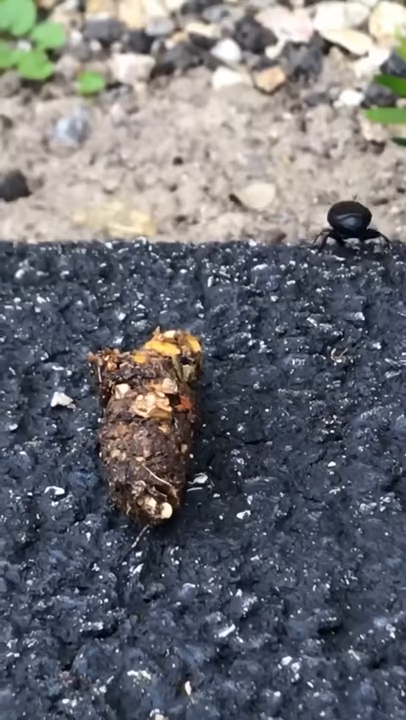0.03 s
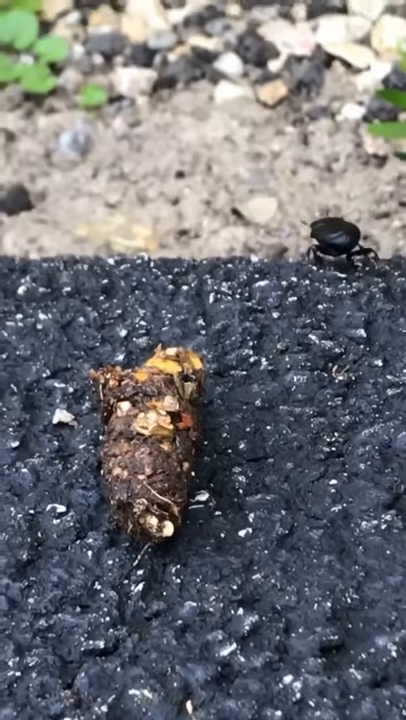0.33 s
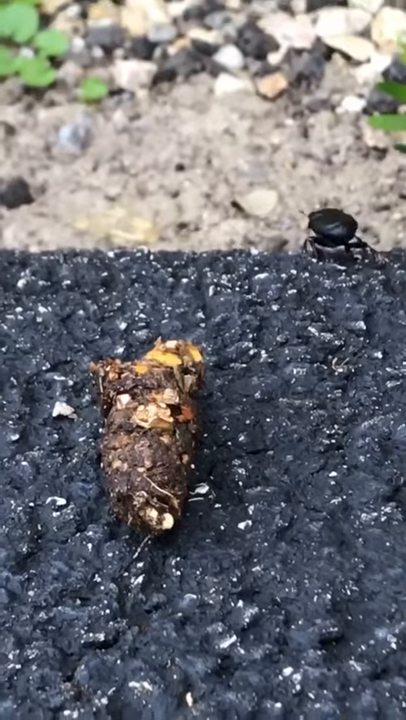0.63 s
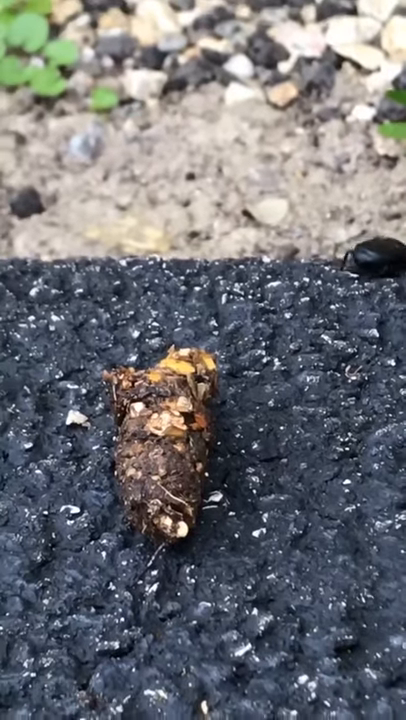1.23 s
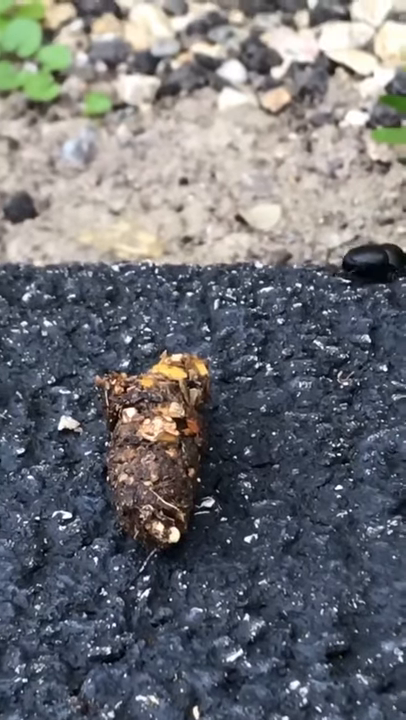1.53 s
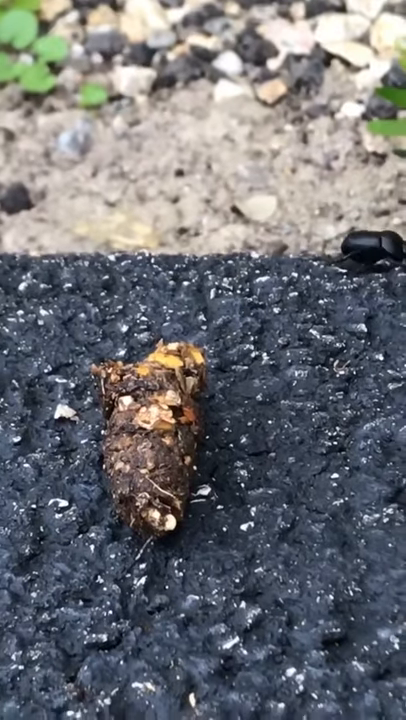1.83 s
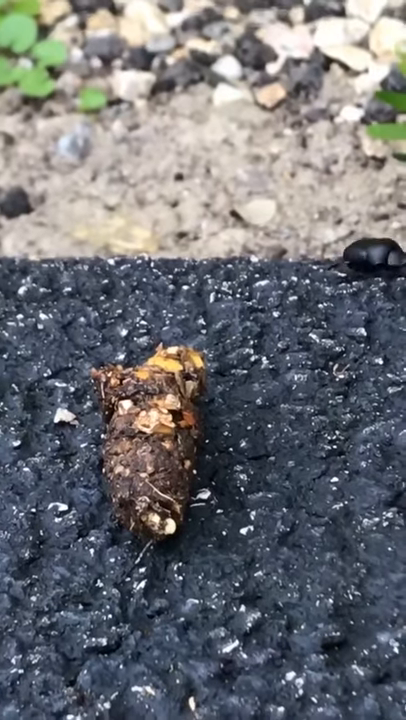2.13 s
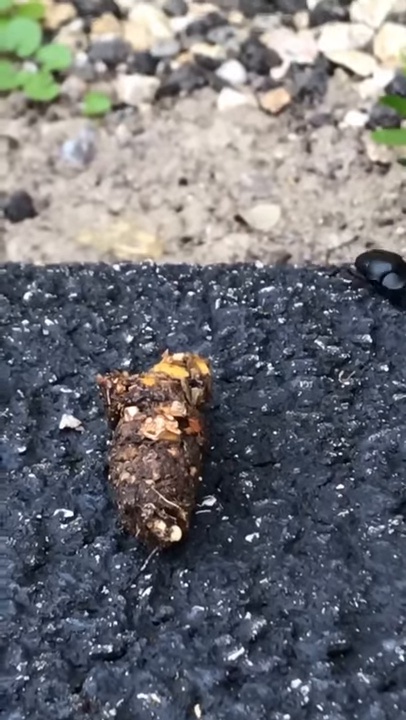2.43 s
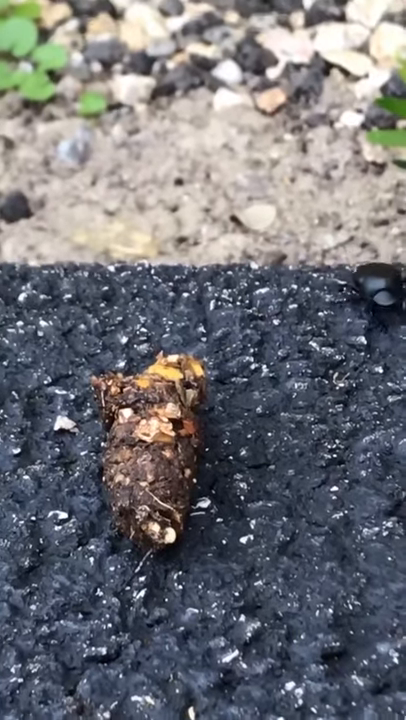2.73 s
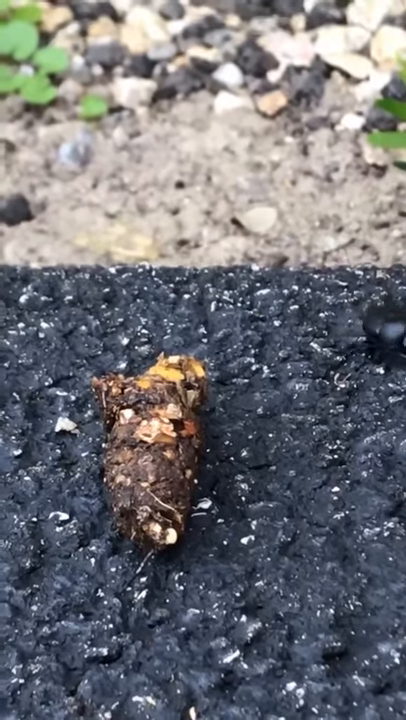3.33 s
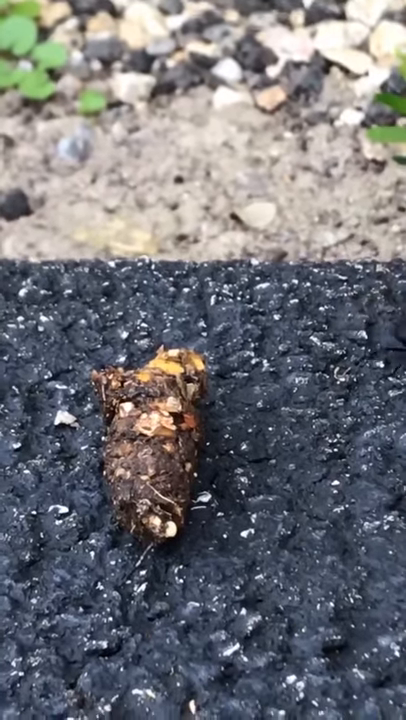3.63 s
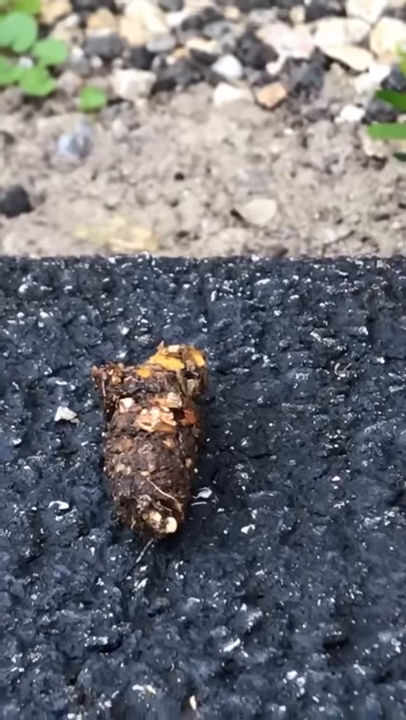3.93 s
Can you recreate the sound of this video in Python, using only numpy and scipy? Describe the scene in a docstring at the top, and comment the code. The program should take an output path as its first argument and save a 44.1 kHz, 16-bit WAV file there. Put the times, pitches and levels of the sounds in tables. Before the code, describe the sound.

A high buzz of cicadas surrounds a handheld microphone outdoors. The closest ones fade after the first second and the rest carry on, over light wind, dull handling bumps, faint dry scuffs and distant chirps.

```python
"""A steady, high buzz of cicadas surrounds a phone held low over the asphalt; the nearest ones start
to die down within the first second. Each clicks its tymbals at its own rate, ringing its hollow body,
over the hiss of a far chorus. Light wind rumbles and the hand bumps the microphone;
a few faint chirps and scuffs stand out of the quiet outdoor air."""
import sys
import numpy as np
from scipy import signal
from scipy.fft import rfft, irfft
from scipy.io import wavfile
from scipy.ndimage import uniform_filter1d

SR = 44100
rng = np.random.default_rng(int(sys.argv[2]) if len(sys.argv) > 2 else 0)


def wav_out(sig):
    """Save sig, one row per channel (or a flat mono array), as 16-bit PCM at SR to the path in sys.argv[1]."""
    wavfile.write(sys.argv[1], SR, np.round(np.clip(np.atleast_2d(sig).T, -1, 1) * 32767).astype(np.int16))


N = 176400


def undb(db):
    """Decibels to gain."""
    return 10 ** (np.asarray(db) / 20)


def level(x, db):
    """Set the rms level."""
    return x * undb(db) / np.sqrt(np.mean(x ** 2))


def freqs():
    """Frequencies of the spectrum bins, floored at 1 Hz."""
    return np.maximum(np.arange(N // 2 + 1) * SR / N, 1)


def noise(points):
    """Noise with a spectrum of (Hz, dB) points."""
    hz, db = np.array(points).T
    gain = undb(np.interp(np.log(freqs()), np.log(hz), db))
    return irfft(rfft(rng.standard_normal(N)) * gain, N)


def walk(per_s):
    """Smooth random wander with a spread near 1."""
    hold = max(int(SR / per_s), 1)
    steps = np.repeat(rng.standard_normal(N // hold + 2), hold)[rng.integers(hold):][:N]
    return np.sqrt(2) * uniform_filter1d(uniform_filter1d(steps, hold), hold)


def swell(t, start, length):
    """A rounded rise and fall."""
    return np.sin(np.pi * np.clip((t - start) / length, 0, 1))


# Open air all around the phone: frequency_hz, relative_db
AIR_SPECTRUM = [(20, -12), (45, -0.5), (80, 1), (150, -2), (250, -6), (400, -9.5), (700, -12.5),
                (1200, -16), (2000, -21.5), (4500, -22), (9000, -47)]
# Light wind on the microphone: frequency_hz, relative_db
WIND_SPECTRUM = [(20, -26), (48, 0.5), (90, -7), (180, -9.5), (300, -20.5), (600, -48)]
# Rise and fall of that wind, low over the asphalt: time_s, level_db
WIND_LEVELS = [(0, -53), (.17, -56), (.5, -59), (.9, -62), (1.03, -68.5), (1.3, -59), (1.48, -61.5),
               (1.8, -57), (2.4, -58.5), (2.62, -61), (2.85, -58), (3.05, -61), (3.27, -50.5), (3.5, -63.5),
               (4, -57.5)]


def air_and_wind(t):
    """Quiet outdoor air with a fluttering wind rumble."""
    gust_db = 3.5 * walk(per_s=18)
    wind_db = np.interp(t, *np.array(WIND_LEVELS).T) + gust_db
    air = level(noise(AIR_SPECTRUM), db=-62)
    return air + level(noise(WIND_SPECTRUM), db=0) * undb(wind_db)


# The cicada chorus, heard from far off: frequency_hz, relative_db
CHORUS_SPECTRUM = [(4000, -39), (5000, -35), (5300, -5.5), (5700, 2.5), (6250, -4), (6800, 2), (7400, 7.5),
                   (8200, 8.5), (8800, 8), (9300, -11)]
# Its three bands at the microphone, before CHORUS_GAIN_DB: time_s, low_db, middle_db, high_db
CHORUS_BAND_LEVELS = [(0, -61.5, -64, -54.5), (.65, -63, -60, -61.5), (1.05, -63, -60.5, -64),
                      (1.3, -63.5, -66.5, -64), (1.6, -63.5, -56.5, -61.5), (1.9, -64, -63, -62),
                      (2.9, -64, -64, -61), (3.6, -65.5, -63.5, -58.5), (4, -65.5, -65.5, -62)]
CHORUS_SPLIT_HZ, CHORUS_GAIN_DB, CHORUS_FLICKER_DB = (6230, 7270), -5.5, 1.15


def far_chorus(t):
    """Countless far cicadas merge into a hiss whose low, middle and high bands swell separately."""
    hiss = level(noise(CHORUS_SPECTRUM), db=0)
    lowpasses = [signal.butter(12, hz, fs=SR, output="sos") for hz in CHORUS_SPLIT_HZ]
    low, below_high = (signal.sosfiltfilt(lowpass, hiss) for lowpass in lowpasses)
    times, *band_levels = np.array(CHORUS_BAND_LEVELS).T
    out = np.zeros(N)
    for band, db in zip((low, below_high - low, hiss - below_high), band_levels):
        flicker_db = CHORUS_FLICKER_DB * walk(per_s=18)
        out += level(band, CHORUS_GAIN_DB) * undb(np.interp(t, times, db) + flicker_db)
    return out


# Faint calls in the distance: start_s, length_s, first_hz, last_hz, width_hz, level_db
DISTANT_CHIRPS = [(.642, .028, 6600, 5950, 220, -63.5), (.662, .032, 5950, 5150, 220, -61.5),
                  (.668, .04, 6150, 5450, 220, -63), (.754, .026, 5950, 5500, 220, -61),
                  (1.915, .049, 4360, 4620, 253, -71.5), (2.445, .04, 4740, 4830, 190, -66),
                  (3.176, .034, 4850, 4700, 220, -64.5), (3.191, .15, 2470, 2620, 80, -73.5),
                  (3.708, .17, 2480, 2600, 80, -76)]


def chirps(t):
    """Short, blurred, gliding calls, likely far birds."""
    out = np.zeros(N)
    for start, length, first_hz, last_hz, width_hz, db in DISTANT_CHIRPS:
        pitch_hz = np.interp(t, [start, start + length], [first_hz, last_hz])
        phase = 2 * np.pi * np.cumsum(pitch_hz) / SR
        blur = walk(2 * width_hz) + 1j * walk(2 * width_hz)
        call = (blur * np.exp(1j * phase)).real
        out += level(call, db) * swell(t, start, length)
    return out


# Dry scuffs close to the phone: start_s, length_s, centre_hz, level_db
CLOSE_SCUFFS = [(0, 0.029, 3400, -62), (0.049, 0.08, 3320, -64), (0.12, 0.15, 4340, -69),
                (0.778, .04, 4000, -69), (1.18, 0.061, 3870, -68.5), (1.77, 0.06, 4700, -67),
                (2.393, 0.15, 4400, -70), (3.255, 0.12, 3500, -71), (3.808, 0.049, 3770, -65.5)]


def scuffs(t):
    """Brief rubs: a band of noise made gritty by a fast flicker in level."""
    out = np.zeros(N)
    for start, length, centre_hz, db in CLOSE_SCUFFS:
        grain_db = 3 * walk(per_s=500)
        grit = rng.standard_normal(N) * undb(grain_db)
        out += level(resonate(grit, centre_hz, width_hz=2040), db) * swell(t, start, length)
    return out


# Wind and hand bumping the microphone itself: time_s, peak_db, pitch_hz
MIC_BUMPS = [(0.044, -37, 93), (0.086, -42.5, 90), (0.119, -49, 84), (0.224, -33.5, 89), (.302, -50, 64),
             (0.373, -40, 86), (0.397, -40.5, 130), (0.43, -41, 250), (0.439, -36.5, 89),
             (0.456, -45.5, 121), (0.526, -50, 75), (0.633, -46, 65.4), (0.673, -43.5, 77),
             (0.809, -46.5, 89), (0.84, -41, 88.5), (0.916, -52.5, 101), (1.149, -50.5, 65),
             (1.205, -46.5, 154), (1.295, -46, 65), (1.329, -44, 75.4), (1.346, -46.5, 71.4),
             (1.374, -50, 63), (1.398, -46.5, 94), (1.571, -42.5, 88.5), (1.603, -44.5, 67),
             (1.703, -41.5, 200), (1.774, -40.5, 163), (1.786, -51, 91), (1.801, -40, 72.6),
             (2.167, -46, 70), (2.187, -44.5, 78), (2.257, -46, 105), (2.298, -43.5, 73.6),
             (2.357, -48, 93), (2.375, -48, 73.5), (2.781, -49.5, 100), (2.89, -41.5, 87),
             (2.953, -43, 124), (2.966, -34.5, 122), (2.992, -31, 99), (3.002, -33.5, 123),
             (3.018, -40.5, 254), (3.029, -42, 144), (3.087, -41, 91), (3.099, -42.5, 98),
             (3.159, -37.5, 107), (3.207, -39, 125), (3.232, -40, 84), (3.246, -42.5, 198),
             (3.281, -34.5, 90), (3.323, -39.5, 126), (3.343, -36.5, 71.4), (3.368, -40.5, 73),
             (3.419, -45, 73), (3.477, -46.5, 66.6), (3.917, -43.5, 95)]
MIC_LOW_HZ, BUMP_TOP_HZ, BUMP_LEAD_S = 35.5, 342, 0.0018
RING_PITCH_RATIO, RING_DAMPING = 1.56, 0.67
TAIL_PITCH_RATIO, TAIL_DAMPING = 0.74, 0.36


def mic_bumps():
    """Each push is a dull thump: a quick ring above its pitch, then a longer tail below it."""
    out, s = np.zeros(N), 1j * freqs()
    bass_cut = s / (MIC_LOW_HZ + s)
    soft_contact = 1 / np.sqrt(1 + (freqs() / BUMP_TOP_HZ) ** 10)
    for time, peak_db, pitch_hz in MIC_BUMPS:
        s_ring, s_tail = s / (pitch_hz * RING_PITCH_RATIO), s / (pitch_hz * TAIL_PITCH_RATIO)
        ring = 1 / (1 + RING_DAMPING * s_ring + s_ring ** 2)
        tail = s_tail / (1 + TAIL_DAMPING * s_tail + s_tail ** 2)
        delay = np.exp(-2 * np.pi * s * (time - BUMP_LEAD_S))  # the push begins just before the thump
        thump = irfft(-bass_cut * soft_contact * ring * tail * delay, N)
        out += undb(peak_db) * thump / np.abs(thump).max()
    return out


def resonate(x, hz, width_hz):
    """A resonance applied twice, for steep skirts."""
    b, a = signal.iirpeak(min(hz, SR * .45), hz / (width_hz * np.pi / 2), fs=SR)
    return signal.lfilter(b, a, signal.lfilter(b, a, x))


def scatter(x, t, decay_s=0.0067):
    """Ground and leaves add a short, dense cloud of echoes."""
    echoes = rng.standard_normal(N) * np.exp(-t / decay_s)
    return x + signal.fftconvolve(x, echoes / np.linalg.norm(echoes))[:N]


CLICK_JITTER_S, CLICK_SPREAD_DB, RATE_DRIFT = .000018, 2, .0014
BODY_LOW_HZ = 5260  # the small bodies radiate little below this


def cicada(t, rate_hz, body_hz, width_hz, db):
    """Nearly regular tymbal clicks ring the hollow body."""
    cycles = np.cumsum(rate_hz * (1 + RATE_DRIFT * walk(per_s=5))) / SR + rng.random()
    click_s = np.interp(np.arange(1, int(cycles[-1])), cycles, t)
    jitter, strength = rng.standard_normal((N // 50, 2))[:len(click_s)].T
    position = (click_s + CLICK_JITTER_S * jitter)[:, None] * SR
    taps = position.astype(int) + np.arange(-3, 5)  # a short sinc places each click between samples
    clicks = np.sinc(taps - position) * undb(CLICK_SPREAD_DB * strength)[:, None]
    pulses = np.zeros(N)
    np.add.at(pulses, np.clip(taps, 0, N - 1), clicks)
    radiation = signal.butter(8, BODY_LOW_HZ, "high", fs=SR, output="sos")
    body = signal.sosfilt(radiation, resonate(pulses, body_hz, width_hz))
    return level(scatter(body, t), db)


def waver(spread_db=3.2):
    """Gain of one singer as it slowly swells and ebbs."""
    return undb(spread_db * walk(per_s=1.6))


def farther_cicadas(t, count=10, ebb_db_per_s=0.53):
    """Farther singers, each on its own rate and resonance, come and go while all slowly ease off."""
    out = np.zeros(N)
    for k, (rate_draw, body_draw) in enumerate(rng.random((count, 2))):
        rate_hz = np.interp(rate_draw, [0, 1], (220, 460))
        body_hz = np.interp((k + body_draw) / count, [0, 1], (6580, 8540))
        out += cicada(t, rate_hz, body_hz, width_hz=1300, db=-73) * waver()
    return out * undb(-ebb_db_per_s * t)


# Single cicadas around the phone: click_rate_hz, body_hz, width_hz, level_db
STEADY_SINGERS = [(399, 7700, 2100, -68.5), (367, 6300, 480, -70.5), (259.4, 7200, 3700, -76.5)]


def steady_cicadas(t):
    """These buzz throughout, each wavering about its own level."""
    return sum(cicada(t, *singer) * waver() for singer in STEADY_SINGERS)


# The cicadas closest to the microphone: click_rate_hz, body_hz, width_hz, opening_level_db
NEAREST_SINGERS = [(421.7, 7780, 1100, -62), (149, 8000, 540, -64.5), (264.8, 8600, 880, -65.5)]


def nearest_cicadas(t, hold_s=0.67, fade_db_per_s=26):
    """The nearest singers hold their buzz, then die down together."""
    fade = undb(-fade_db_per_s * np.maximum(t - hold_s, 0))
    return sum(cicada(t, *singer) for singer in NEAREST_SINGERS) * fade


def scene():
    """All sources at one microphone, low over the asphalt."""
    t = np.arange(N) / SR
    cicadas = nearest_cicadas(t) + steady_cicadas(t) + farther_cicadas(t) + far_chorus(t)
    return (air_and_wind(t) + chirps(t) + scuffs(t) + mic_bumps() + cicadas)[None]


def record(dry):
    """The phone cuts the top steeply."""
    top_hz = 9100
    return signal.sosfilt(signal.ellip(10, .2, 70, top_hz, fs=SR, output="sos"), dry)


dry = scene()
out = record(dry)
wav_out(out)
```